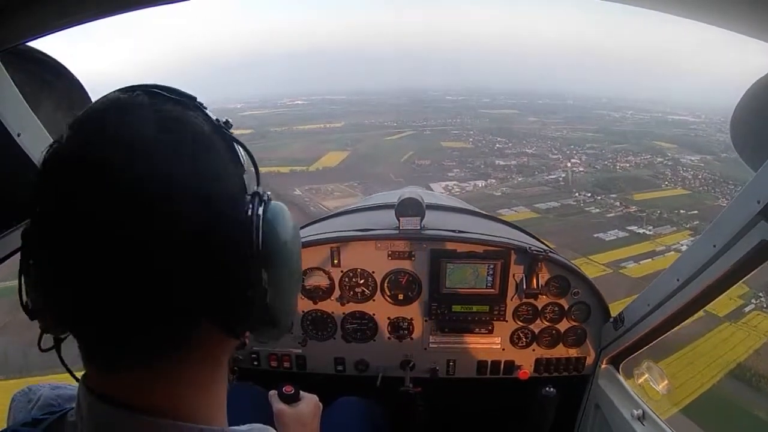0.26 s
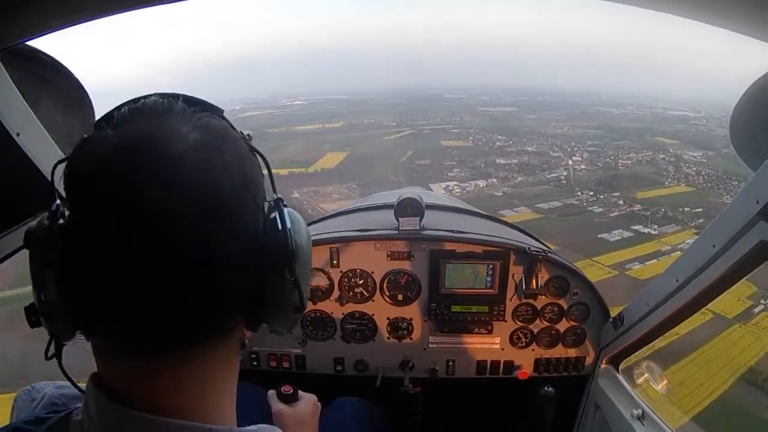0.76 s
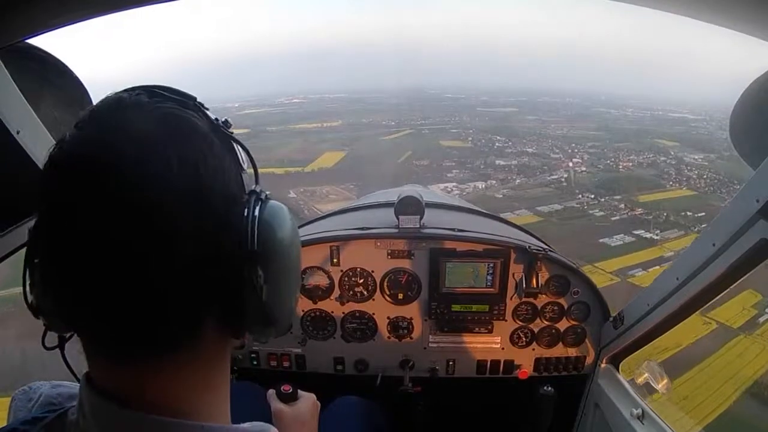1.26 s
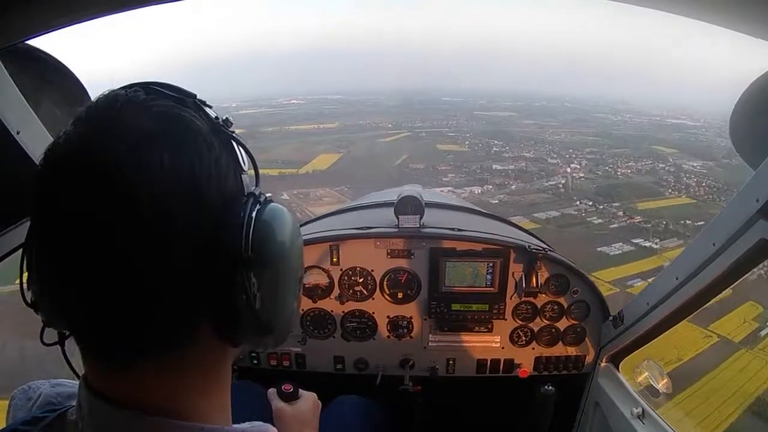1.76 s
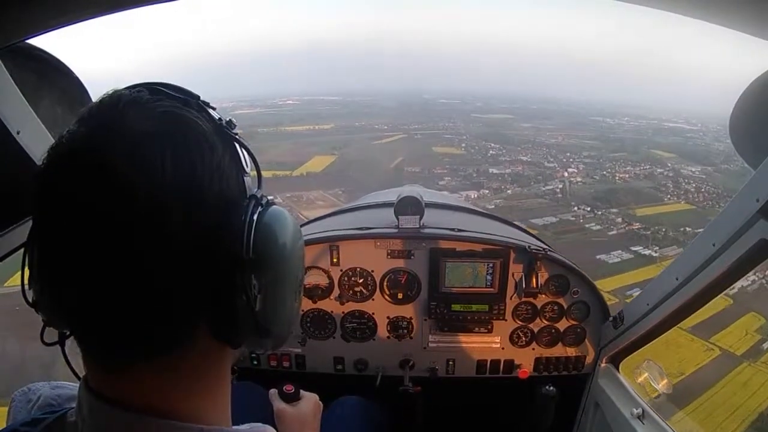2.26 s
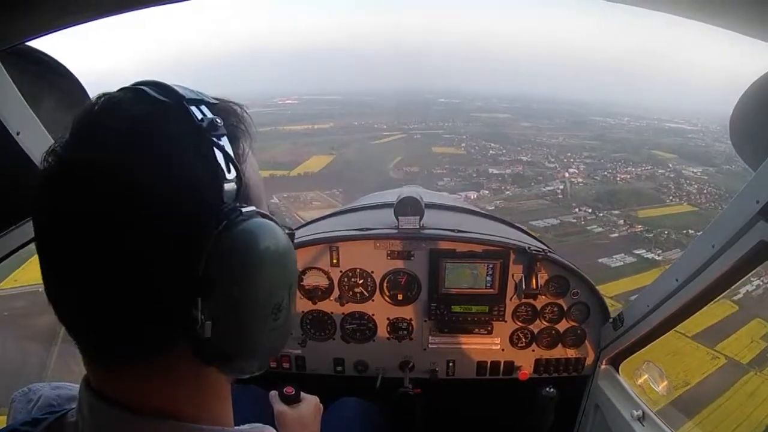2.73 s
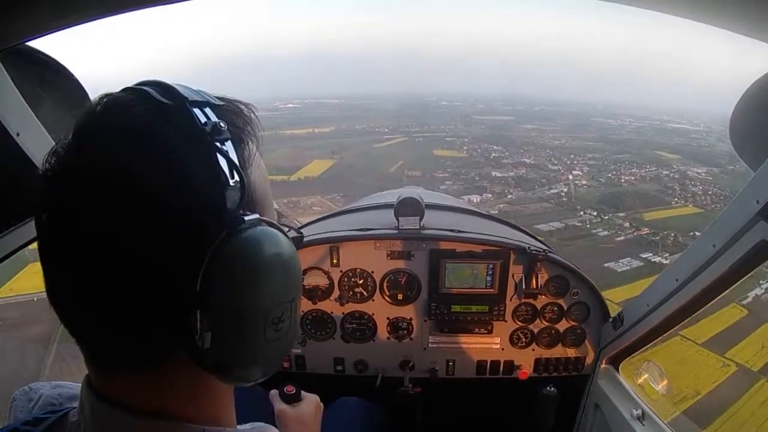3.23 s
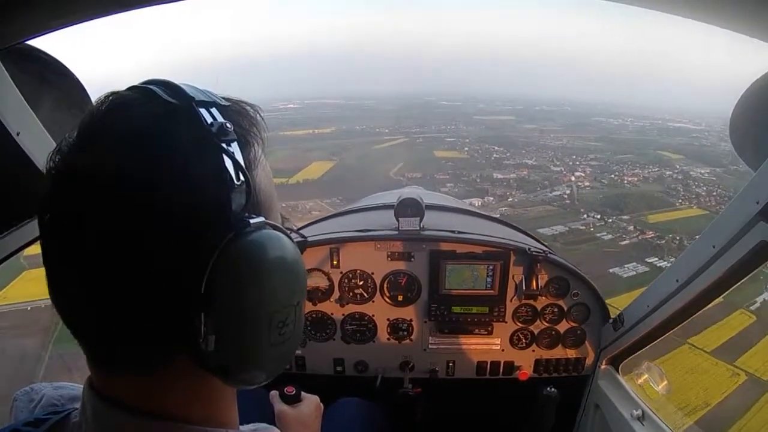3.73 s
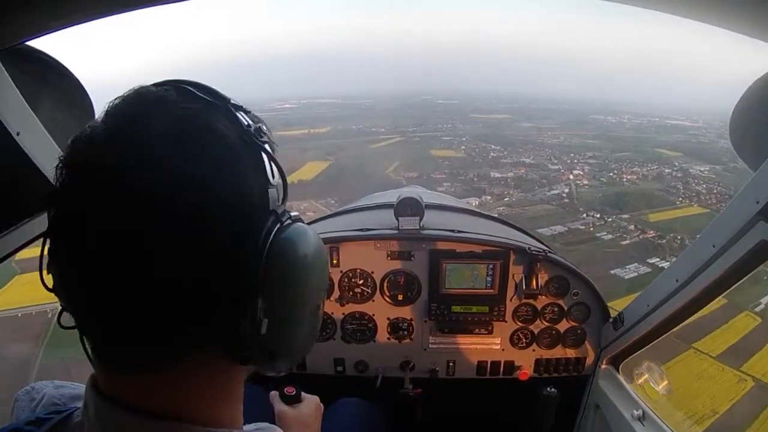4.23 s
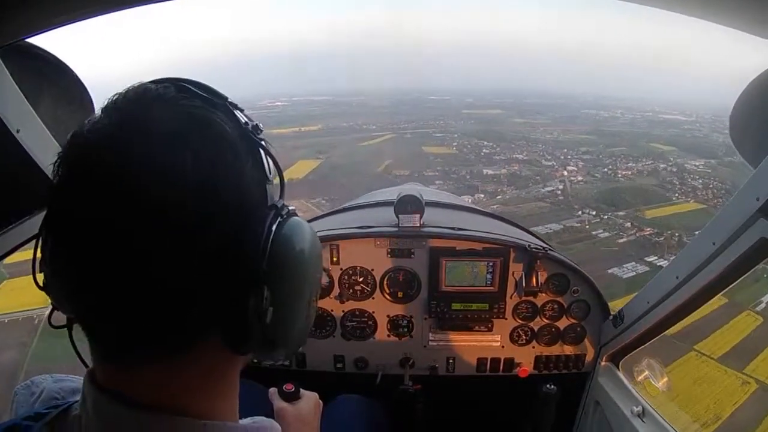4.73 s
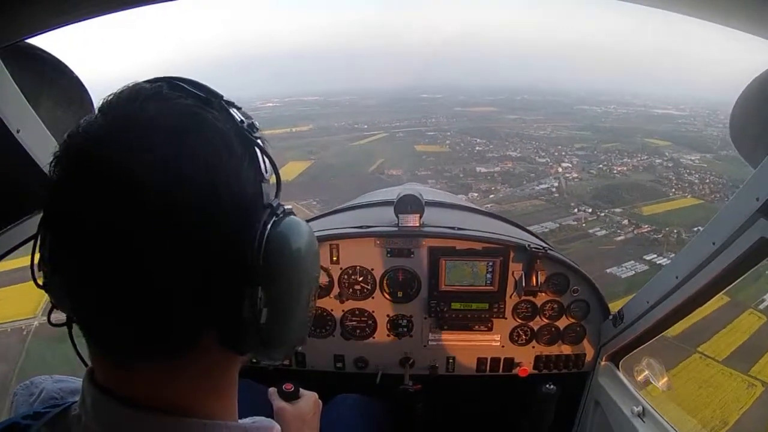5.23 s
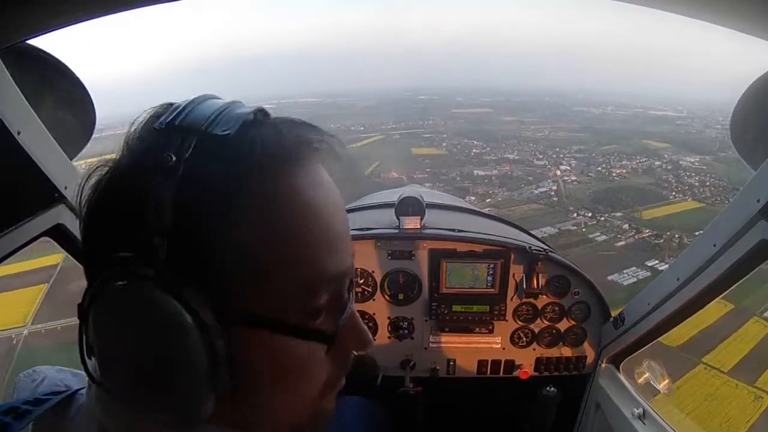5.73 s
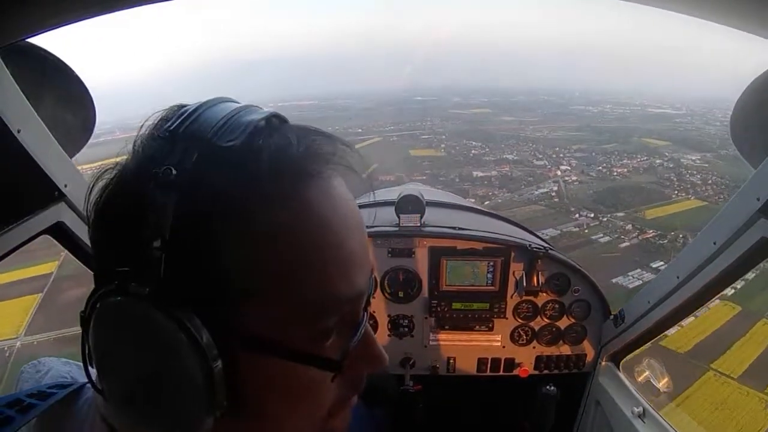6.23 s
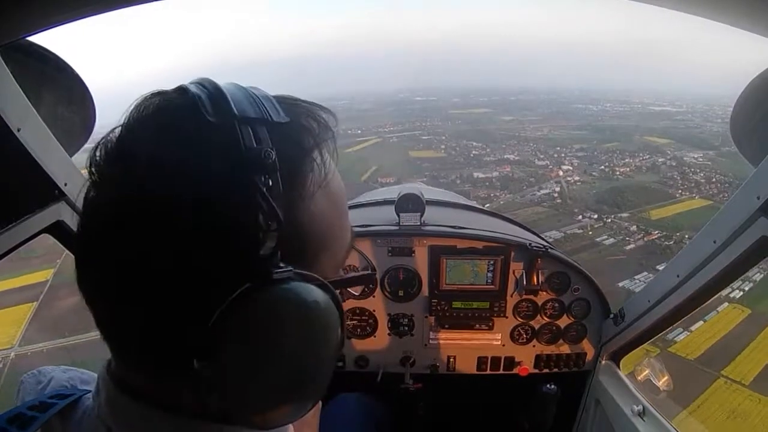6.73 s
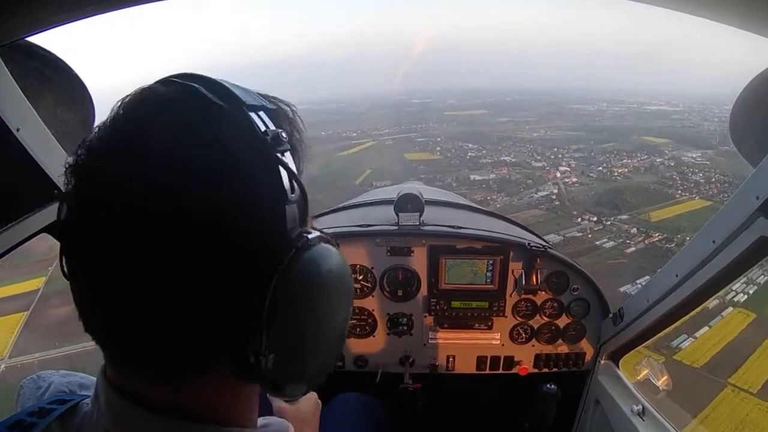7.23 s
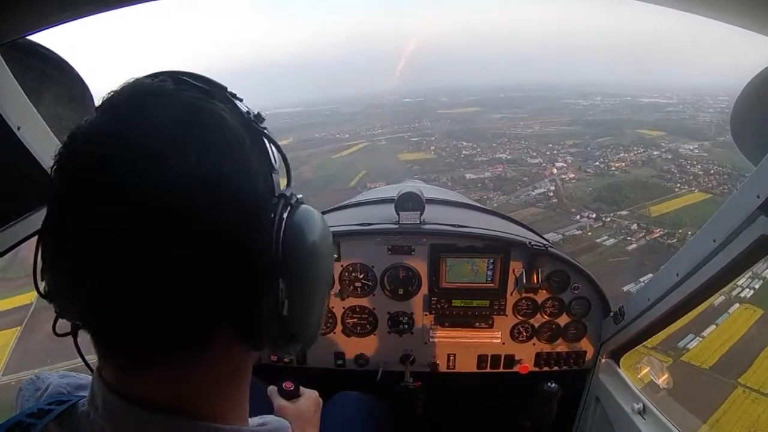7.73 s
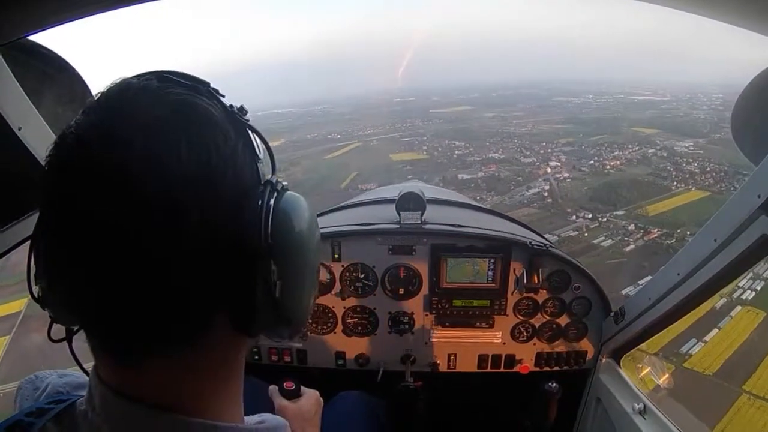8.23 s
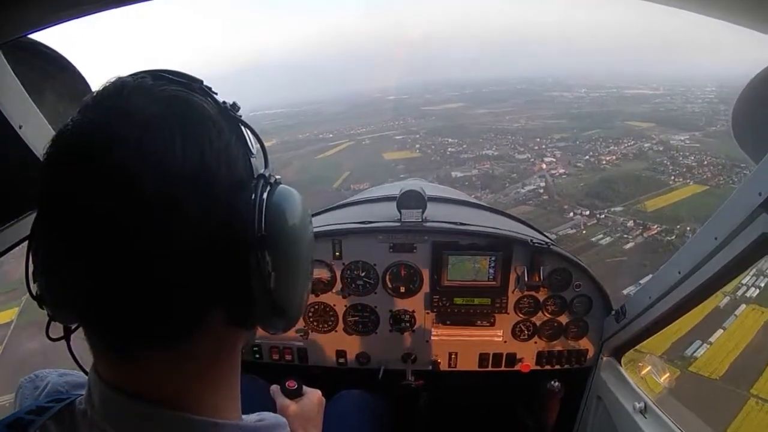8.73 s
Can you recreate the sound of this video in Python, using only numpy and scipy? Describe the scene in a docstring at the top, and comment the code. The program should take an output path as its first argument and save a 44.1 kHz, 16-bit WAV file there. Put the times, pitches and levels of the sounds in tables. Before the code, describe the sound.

Inside a light aircraft cockpit, a loud beating piston engine drone with rushing air; around four seconds the throttle eases back and air dominates.

```python
"""Light aircraft cockpit, throttle coming back

A four-cylinder engine drones and beats against its geared propeller, both built from sines locked to shaft angle.
Noise for rushing air and engine roar rings the cabin and canopy; a wandering low sine is the airframe's boom.
Near four seconds the throttle comes back, the drone sinks and the air takes over.
A faint whine sits on top, and the loudest peaks overload the microphone."""
import sys
import numpy as np
from scipy.fft import rfft, irfft
from scipy.io import wavfile

SR = 44100
rng = np.random.default_rng(int(sys.argv[2]) if len(sys.argv) > 2 else 0)


def output_pcm(signal):
    """Save a mono or channel-first signal as 16-bit PCM at the path in sys.argv[1].

    Samples are clipped to [-1, 1] before scaling.
    """
    pcm = np.clip(np.atleast_2d(signal).T, -1, 1) * 32767
    wavfile.write(sys.argv[1], SR, np.round(pcm).astype(np.int16))


N = 396018
TIME = np.arange(N) / SR  # s
FREQS = np.fft.rfftfreq(N, 1 / SR)  # Hz
THROTTLE_BACK_S = 4.0


def from_db(db):
    """Turn decibels into gain."""
    return 10 ** (np.asarray(db) / 20)


def rms_one(x):
    """Scale to rms 1."""
    return x / np.sqrt(np.mean(x ** 2) + 1e-20)


def in_time(rows):
    """Draw a (seconds, value) table as a curve of straight lines."""
    seconds, values = np.transpose(rows)
    return np.interp(TIME, seconds, values)


def drift(rate_hz):
    """Random motion of rms 1: noise smoothed above the given rate."""
    smoothing = 1 + (FREQS / rate_hz) ** 2
    return rms_one(irfft(rfft(rng.standard_normal(N)) / smoothing, N))


def through_cabin(excitation, spectrum):
    """Colour noise with a smooth spectrum and the resonances of cabin air, canopy and panels; rms 1."""
    # Modes of the cabin air. Each row: centre in Hz, width in Hz, lift in dB.
    cabin_modes = [(78.9, 17.7, 8), (131, 11.4, 8), (148.8, 8.9, 12.5), (158.3, 7.5, 11.5),
                   (216.1, 10, 9.5), (234.2, 22.3, 7)]
    # Modes of the canopy and panels. Each row: centre in Hz, width in Hz, lift in dB.
    panel_modes = [(330, 49, 2.1), (400, 41, 5.1), (513, 112, 4.6), (630, 80, 5.0), (739, 87, 5.2),
                   (795, 75, 4.1), (951, 65, 6.6), (1188, 246, 5.4), (1281, 48, 2.2), (1513, 98, 10.2),
                   (1695, 125, 5.0), (1899, 175, 4.7), (2289, 175, 4.8), (2454, 279, 9.6), (2613, 123, 5.2),
                   (2956, 175, 2.8), (3575, 227, 3.5), (3919, 257, 3.5), (4471, 173, 6.8), (4764, 332, 8.2),
                   (5238, 406, 5.0), (5858, 208, 4.0), (6883, 403, 5.2), (9781, 2250, 6.0)]
    hz, level_db = np.transpose(spectrum)
    colour_db = np.interp(np.log(FREQS + 1), np.log(hz), level_db)
    for centre, width, lift_db in [*cabin_modes, *panel_modes]:
        detuning = 2 * (FREQS - centre) / width
        colour_db = colour_db + lift_db / (1 + detuning ** 2) ** 2
    return rms_one(irfft(rfft(excitation) * from_db(colour_db), N))


def thin_whine():
    """A faint tone at the top of hearing, roughened by fast random motion of its level and phase."""
    whine_hz, whine_db = 15704, -54.3
    rough_share, rough_rate_hz = .22, 120
    phase = 2 * np.pi * whine_hz * TIME
    flicker = drift(rough_rate_hz) * np.sin(phase) + drift(rough_rate_hz) * np.cos(phase)
    return np.sqrt(2) * from_db(whine_db) * (np.sin(phase) + rough_share * flicker)


def airframe_boom():
    """The lowest mode of the cabin, buffeted so that its level flutters and its phase wanders."""
    # Swells of the boom. Each row: time in seconds, level in dB before the trim.
    boom_swells = [(0.0, -20), (0.65, -17), (0.7, -30), (1.05, -16), (1.1, -31), (1.25, -18), (1.5, -26),
                   (1.88, -19), (3.9, -17), (4.03, -12), (4.8, -26.5), (5.28, -17.5), (6.05, -19.5),
                   (6.15, -34), (6.65, -15), (7.2, -26.5), (8.85, -19.5), (8.98, -31)]
    boom_hz, trim_db = 32.7, -1
    flutter_db, flutter_rate_hz = 0.5, 6
    wander_rad, wander_rate_hz = 1.0, 2.1
    level_db = in_time(boom_swells) + trim_db + flutter_db * drift(flutter_rate_hz)
    phase = 2 * np.pi * boom_hz * TIME + wander_rad * drift(wander_rate_hz)
    return np.sqrt(2) * from_db(level_db) * np.sin(phase)


def air_rush(load_db):
    """Turbulent air on the canopy: slightly fluttering noise, rung by the cabin."""
    # Smooth colour of the rushing air. Each row: frequency in Hz, relative level in dB per Hz.
    rush_colour = [(100, -24), (400, -10), (700, -8), (900, -1.5), (1400, -1.5), (1650, -9.5),
                   (2050, -16.5), (3300, -15.5), (4200, -28), (5300, -29.5), (6200, -41.5), (7600, -49),
                   (10000, -48), (11200, -49), (12700, -45.5), (14000, -50), (15500, -49)]
    full_load_db, db_per_load_db = -17.5, 0.1
    flutter_db, flutter_rate_hz = 0.46, 12.0
    sag_db_per_s = 0.16  # the air dies down as the aircraft slows after the throttle comes back
    slowing_db = sag_db_per_s * np.maximum(TIME - THROTTLE_BACK_S, 0)
    rush_db = full_load_db + db_per_load_db * load_db - slowing_db
    turbulence = rng.standard_normal(N) * from_db(flutter_db * drift(flutter_rate_hz))
    return from_db(rush_db) * through_cabin(turbulence, rush_colour)


def engine_roar(crank, load_db):
    """Exhaust and propeller wash: noise that swells with each of the two firings per turn."""
    # Smooth colour of the roar. Each row: frequency in Hz, relative level in dB per Hz.
    roar_colour = [(15, -28), (26, -15), (42, 3), (90, 2), (110, -2.5), (240, -2.5), (300, -7.5),
                   (450, -14.5), (700, -20.5), (1300, -18.5), (2000, -27), (3300, -24.5), (6000, -61.5),
                   (15000, -73)]
    full_load_db, db_per_load_db = -15, 0.27
    throb = 0.15  # depth of the swell, as a share
    puffs = rng.standard_normal(N) * (1 + throb * np.cos(2 * crank))
    return from_db(full_load_db + db_per_load_db * load_db) * through_cabin(puffs, roar_colour)


def shaft_tones(angle, orders, load_db):
    """Tones locked to a turning shaft; each grows with load and wavers in level and phase."""
    waver_share, waver_rate_hz = .17, 4
    out = np.zeros(N)
    for multiple, full_load_db, db_per_load_db in orders:
        phase = multiple * angle
        in_step = (1 + waver_share * drift(waver_rate_hz)) * np.sin(phase)
        out_of_step = waver_share * drift(waver_rate_hz) * np.cos(phase)
        level_db = full_load_db + db_per_load_db * load_db
        out += np.sqrt(2) * from_db(level_db) * (in_step + out_of_step)
    return out


def propeller(crank, load_db):
    """Propeller and gearbox tones, locked to a shaft geared down from the crankshaft."""
    # Propeller and gearbox tones.
    # Each row: multiple of the propeller shaft rate, level in dB at full load, dB change per dB of load.
    prop_orders = [(2, -29, .1), (3, -30, .4), (6, -32, .5), (8, -25, 1.1), (9, -37, .5), (10, -37, .7),
                   (14, -39, .7), (42, -33, .7), (48, -39, .6)]
    gear_ratio = 2.6406
    # the eighth multiple lies just above the crankshaft's third: they beat about twice a second
    return shaft_tones(crank / gear_ratio, prop_orders, load_db)


def crank_overtones(crank, load_db):
    """Higher multiples of the crankshaft rate, which give the drone its edge."""
    # Higher crankshaft tones.
    # Each row: multiple of the crankshaft rate, level in dB at full load, dB change per dB of load.
    crank_orders = [(1.5, -35, .7), (2.5, -37, .6), (3, -24, 1.0), (3.5, -39, .7), (4, -38, .6),
                    (5, -37, .7), (7, -42, .6), (8, -41, .6), (11, -35, 1.0), (12, -38, .8)]
    return shaft_tones(crank, crank_orders, load_db)


def main_drone(crank, load_db):
    """The once-per-turn shake and twice-per-turn firing tone; both fade as the throttle comes back."""
    # Firing tone under power. Each row: time in seconds, level in dB before the trim and throttle drop.
    firing_swells = [(0.0, -26.5), (0.67, -15), (0.87, -35), (1.05, -15), (1.24, -24), (1.4, -11),
                     (1.62, -29), (1.68, -18.5), (2.29, -31), (2.69, -14.5), (2.75, -27), (2.99, -13),
                     (3.09, -21.5), (3.88, -13.5), (3.92, -25), (4.1, -30)]
    shake_full_load_db, shake_db_per_load_db = -14, 1.3
    firing_trim_db, firing_drop_db = -0.75, 6
    throttle_takes_s = .3
    shake = from_db(shake_full_load_db + shake_db_per_load_db * load_db) * np.sin(crank)
    pulled_back = np.clip((TIME - THROTTLE_BACK_S) / throttle_takes_s, 0, 1)
    firing_db = in_time(firing_swells) + firing_trim_db - firing_drop_db * pulled_back
    firing = from_db(firing_db) * np.sin(2 * crank)
    return np.sqrt(2) * (shake + firing)


def scene():
    """Mix whine, boom, air, roar, propeller and engine; the throttle's load curve steers the last four."""
    # Engine speed. Each row: time in seconds, crankshaft turns per second before a slight random drift.
    engine_speed = [(0, 77.8), (2.8, 77.9), (3.3, 77.2), (3.8, 76.4), (4.0, 72.5), (4.2, 67.5), (4.5, 64.5),
                    (5.0, 63.6), (5.6, 64.2), (7.0, 64.2), (8.0, 63.5), (9.0, 63.2)]
    # Throttle. Each row: time in seconds, load in dB, where 0 is full load.
    throttle_load = [(0, -0.3), (2.6, -0.5), (3.1, -2.2), (3.6, -2.3), (4.0, -5.5), (4.3, -11), (9.0, -14)]
    load_db = in_time(throttle_load)
    turns_per_s = in_time(engine_speed) * (1 + .001 * drift(3))
    crank = 2 * np.pi * np.cumsum(turns_per_s) / SR  # angle in radians
    background = thin_whine() + airframe_boom() + air_rush(load_db)
    roar = engine_roar(crank, load_db)
    engine = crank_overtones(crank, load_db) + main_drone(crank, load_db)
    return (background + roar + propeller(crank, load_db) + engine)[None]


def record(dry):
    """Microphone overload clips the highest peaks with a faint crackle; the top is then cut steeply."""
    ceiling_db, cutoff_hz, slope_width_hz = -0.5, 15760, 40
    ceiling = from_db(ceiling_db)
    clipped = np.clip(dry, -ceiling, ceiling)
    mirrored = np.concatenate([clipped, clipped[:, ::-1]], axis=1)  # smooth ends for the filter
    hz = np.fft.rfftfreq(2 * N, 1 / SR)
    passband = np.clip((cutoff_hz - hz) / slope_width_hz + .5, 0, 1)
    return irfft(rfft(mirrored) * passband)[:, :N]


dry = scene()
out = record(dry)
output_pcm(out)
```